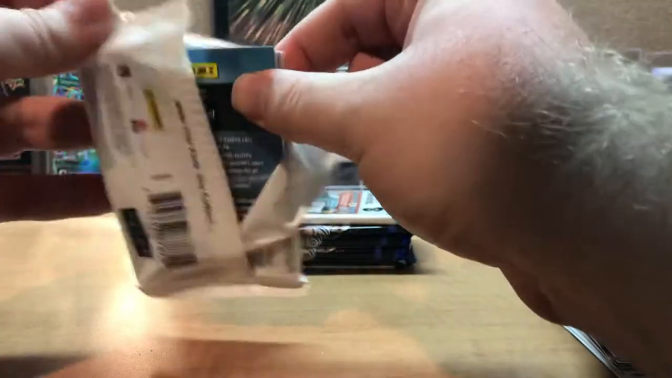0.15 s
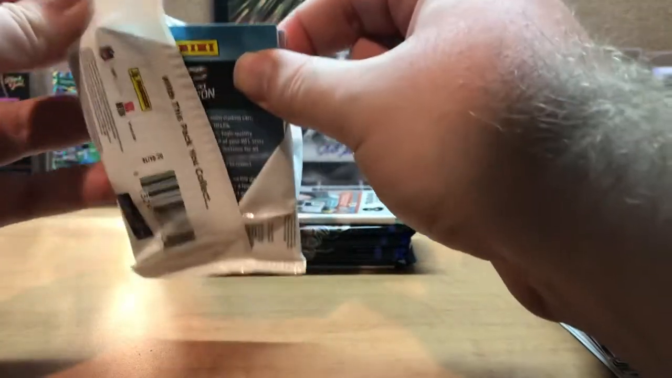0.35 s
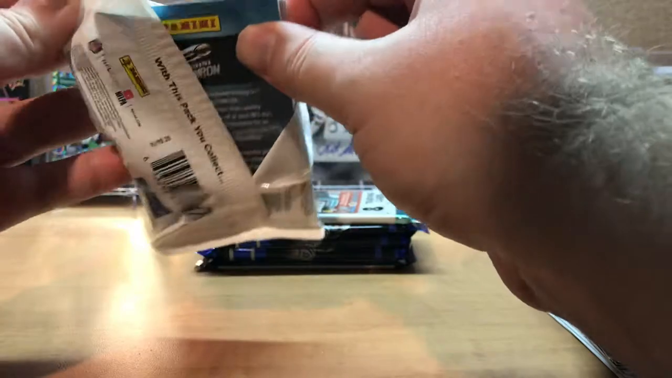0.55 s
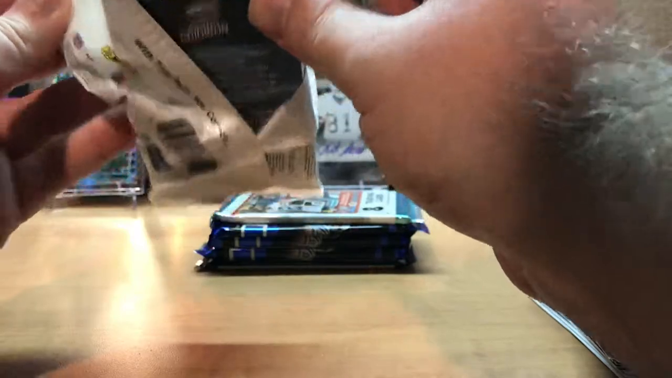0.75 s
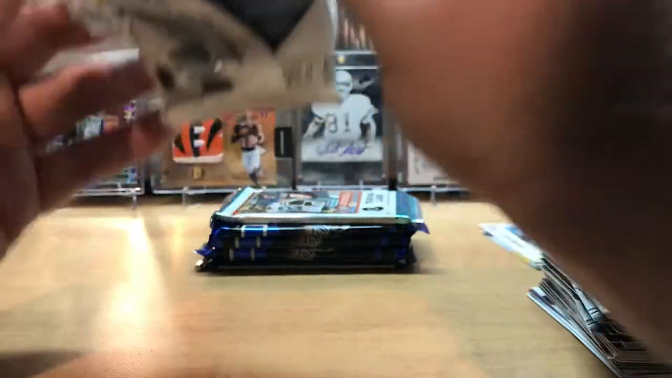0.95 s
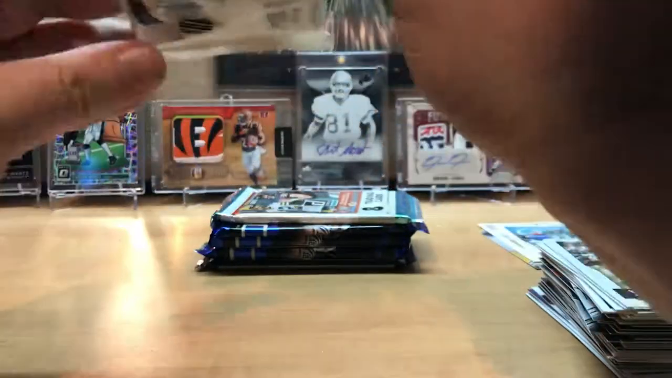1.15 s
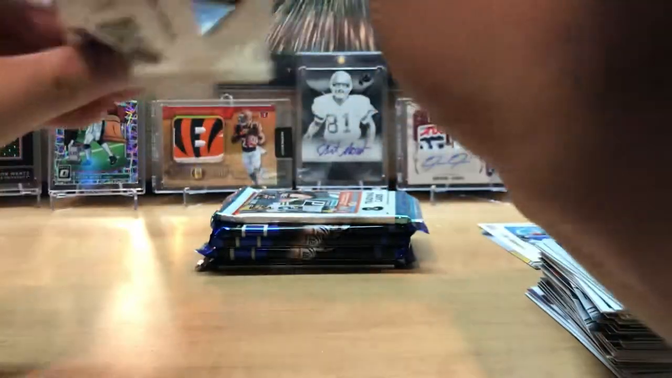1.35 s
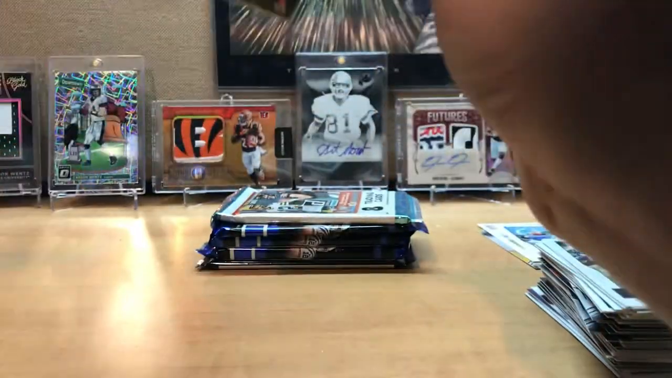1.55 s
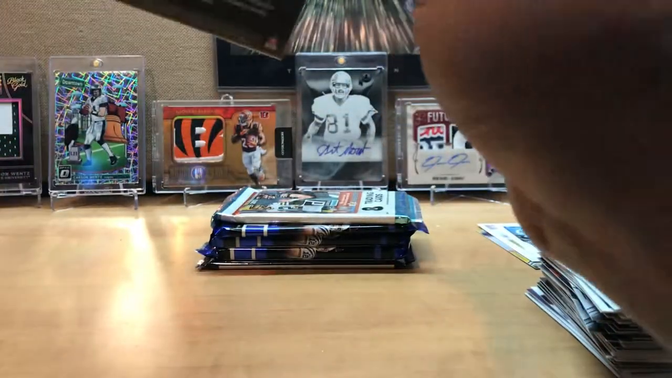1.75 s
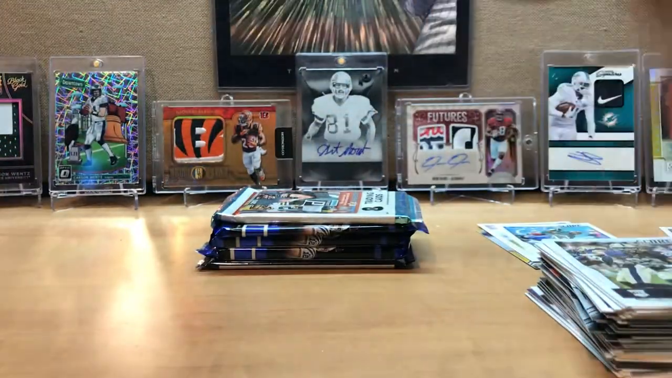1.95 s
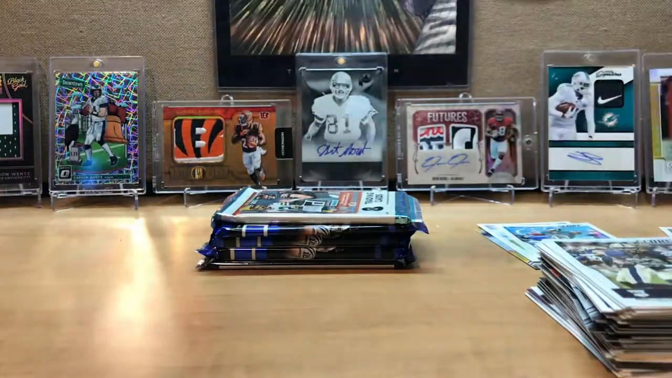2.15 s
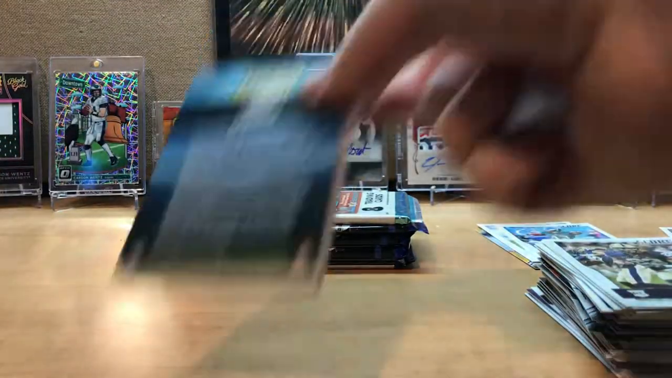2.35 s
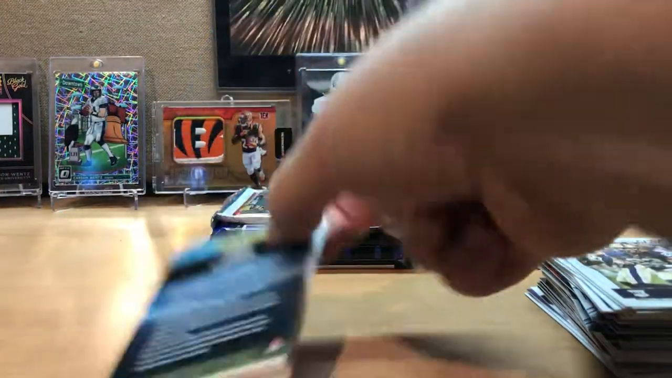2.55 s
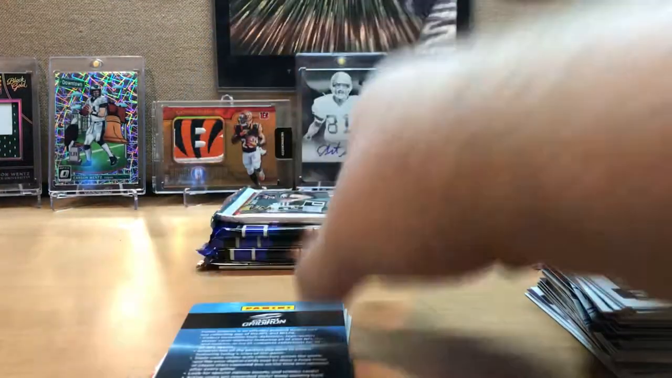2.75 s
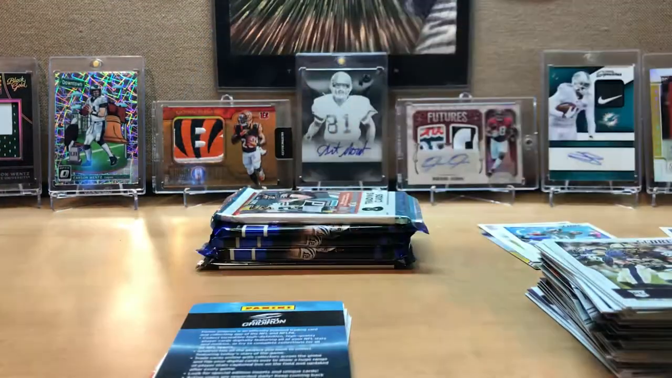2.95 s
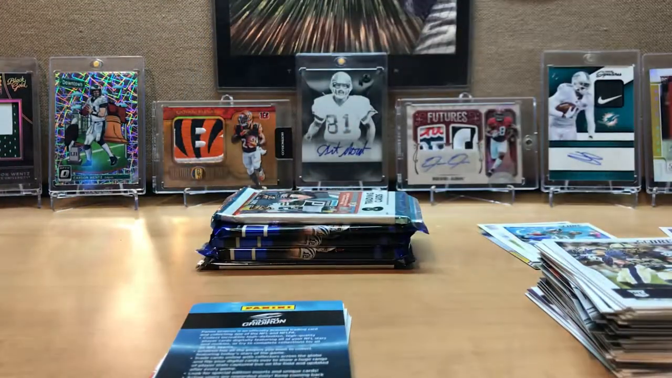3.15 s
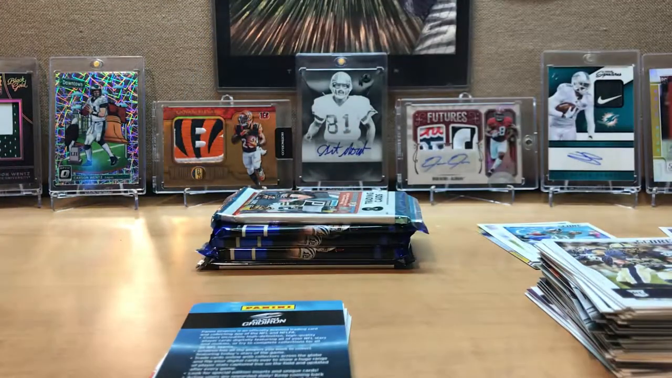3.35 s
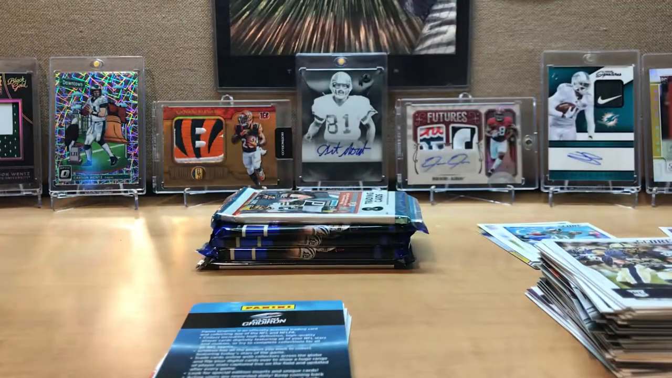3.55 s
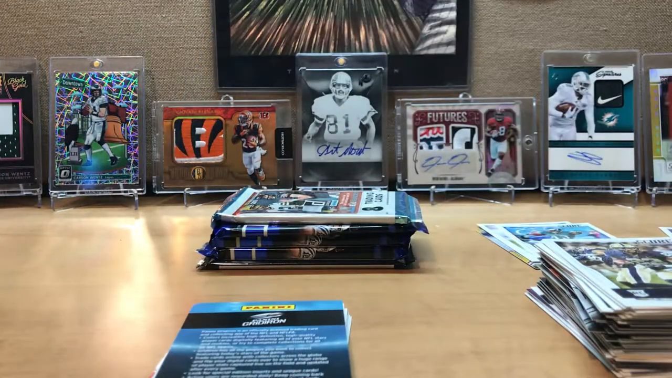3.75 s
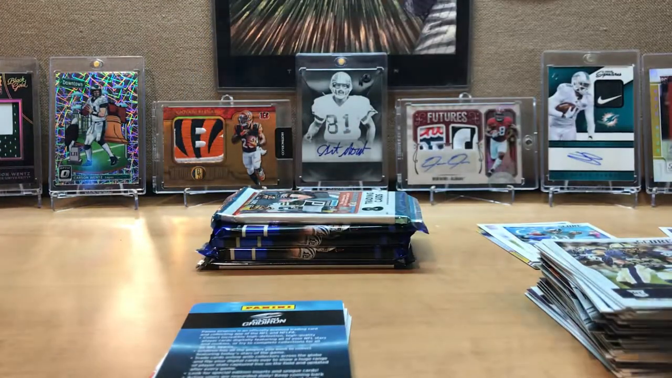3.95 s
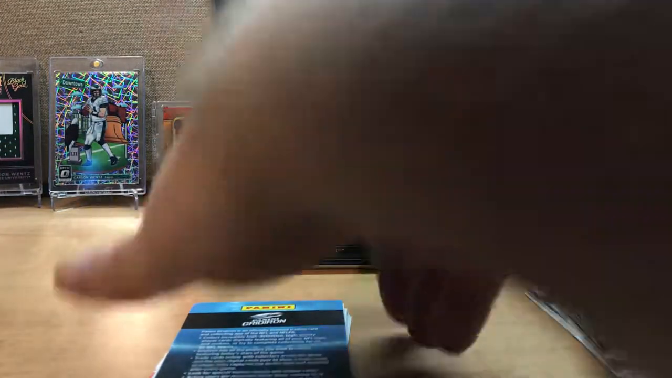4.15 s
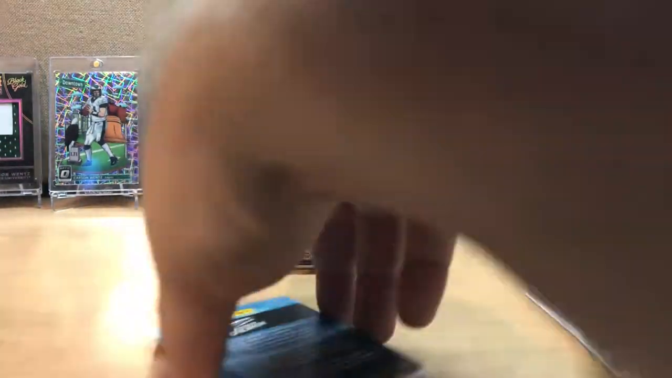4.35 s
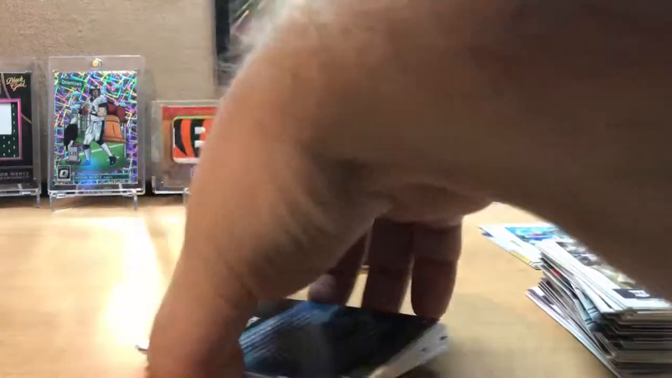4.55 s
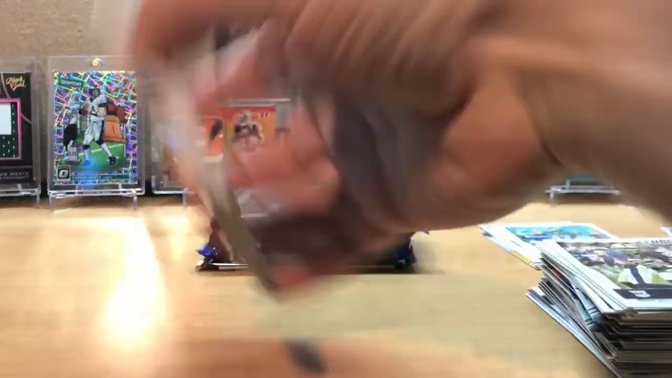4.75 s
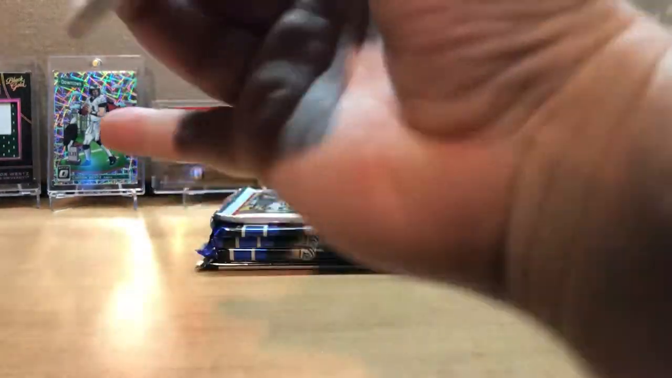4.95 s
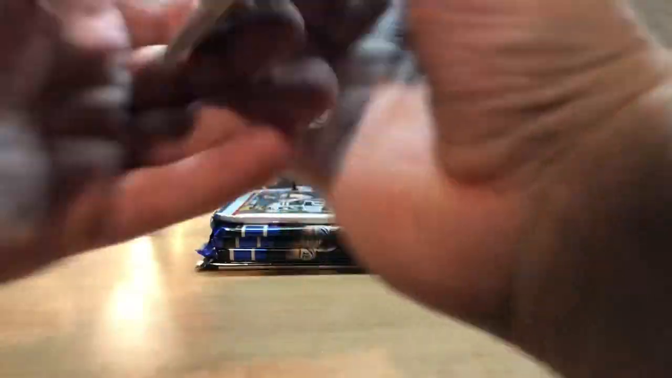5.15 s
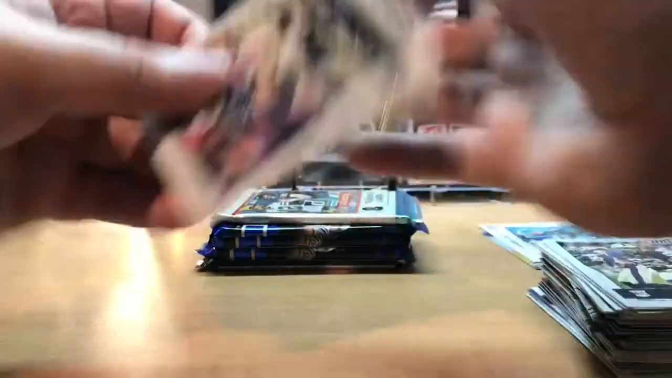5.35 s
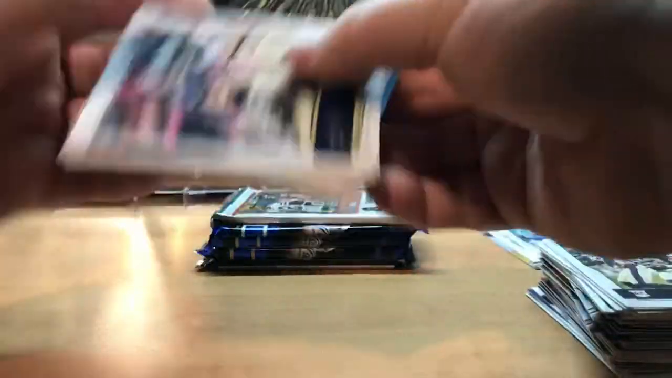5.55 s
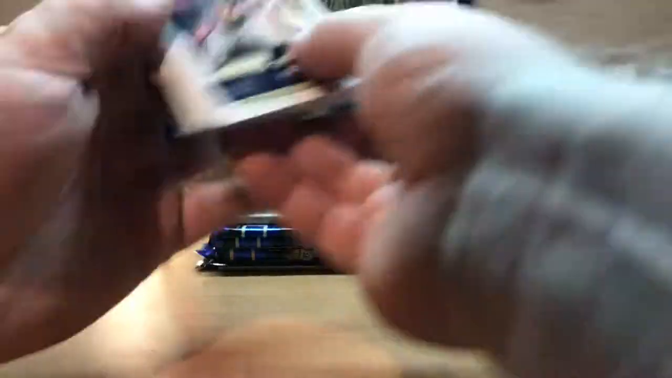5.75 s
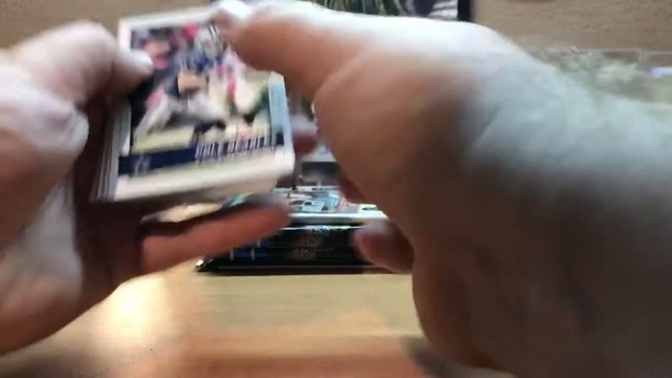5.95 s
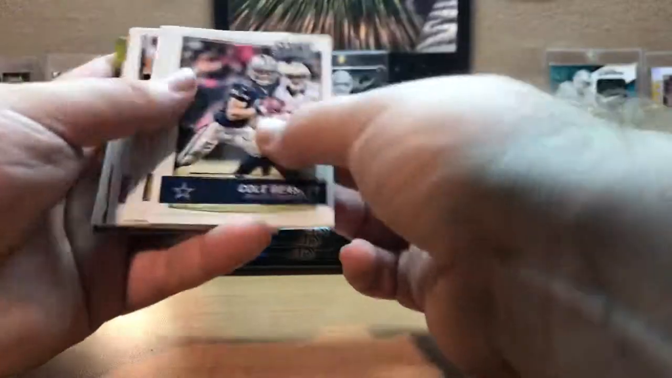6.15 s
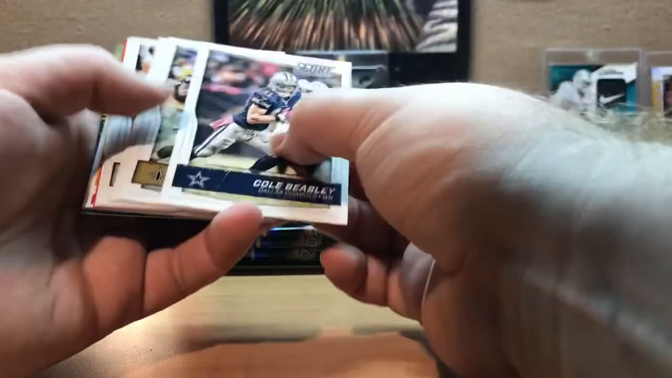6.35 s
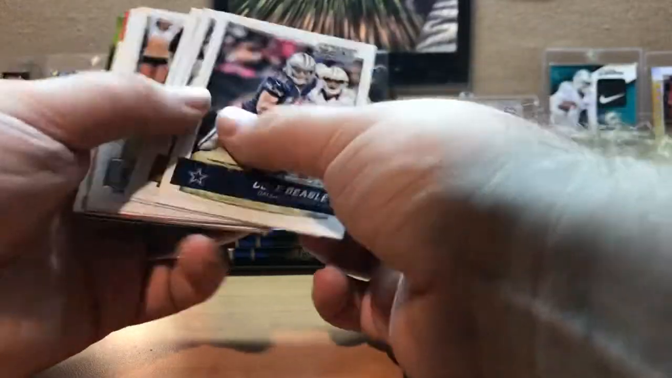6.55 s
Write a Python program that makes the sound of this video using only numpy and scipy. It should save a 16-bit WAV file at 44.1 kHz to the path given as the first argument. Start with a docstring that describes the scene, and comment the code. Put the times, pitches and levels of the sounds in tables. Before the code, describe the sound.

A close, dry recording in a small quiet room, with low rumble, soft hiss and a faint hum underneath. From about 0.1 seconds a foil pack is torn open: sharp, bright snaps crowd together, loudest around 0.15 to 0.3, with little hollow booms of air inside. Crackles continue unevenly, with another strong cluster from 0.7 to 0.85 and again from 1.05 to 1.3. A rush of hissing foil peaks near 1.45, then thins to sparse faint crinkles by 2. At 2.7 a card stack slaps onto the wooden desk with a short ringing knock. Around 3 the wrapper crackles lightly aside, fading to near quiet. At 4.27 a soft bump begins short dull scrapes as cards are dragged off until 4.7. From 5.2 onward, faint edge ticks, papery swishes and muffled hand bumps continue to about 6.6.

```python
"""At a wooden desk in a quiet room, close to the microphone, hands tear a foil card pack open: creases snap,
the air inside booms and the foil hisses in the fingers. The cards slide out and are dropped on the desk, whose
wood rings; the wrapper is crumpled aside with fainter snaps and a soft brush. The cards are then dragged off in
scraping strokes, lifted and fanned, ticking at their edges and swishing, while hands and arms shake and rub the
desk. Desk thumps, room rumble, hiss and hum lie underneath."""
import sys
import numpy as np
from scipy import signal
from scipy.fft import rfft, irfft
from scipy.io import wavfile
from scipy.ndimage import uniform_filter1d

SR = 44100
rng = np.random.default_rng(int(sys.argv[2]) if len(sys.argv) > 2 else 0)


def store_wav(level_fs):
    """Save 16-bit WAV to argv[1]."""
    pcm = np.round(np.clip(np.atleast_2d(level_fs), -1, 1) * 32767)
    wavfile.write(sys.argv[1], SR, pcm.T.astype(np.int16))


N = 291942  # samples in the scene


def amp(db):
    """Decibels to a linear gain."""
    return 10 ** (np.asarray(db) / 20)


def evened(x):
    """Scale to an rms of 1."""
    return x / np.sqrt(np.mean(x ** 2) + 1e-20)


def peaked(x):
    """Scale to a peak of 1."""
    return x / (abs(x).max() + 1e-12)


def smoothed(x, size):
    """Two moving averages in a row leave only slow wandering."""
    return uniform_filter1d(uniform_filter1d(x, size), size)


def add(mix, start_s, sound):
    """Lay a sound into the mix, cut off at the end of the scene."""
    part = mix[round(start_s * SR):][:len(sound)]
    part += sound[:len(part)]


def gain_curve(rows):
    """A gain along the whole scene from (start_s, level_db) rows, at -150 dB outside them."""
    start_s, level_db = np.transpose(rows)
    return amp(np.interp(np.arange(N) / SR, start_s, level_db, left=-150, right=-150))


def band(x, lo_hz, hi_hz):
    """Keep one band."""
    edges = [lo_hz, min(hi_hz, .45 * SR)]
    return signal.sosfilt(signal.butter(2, edges, "band", fs=SR, output="sos"), x)


def ring(x, hz, width_hz):
    """One resonance with two poles: the narrower it is, the longer it rings."""
    r = np.exp(-np.pi * width_hz / SR)
    return signal.lfilter([1, 0, -1], [1, -2 * r * np.cos(2 * np.pi * hz / SR), r * r], x)


def coloured(x, points):
    """Shape a spectrum through (pitch_hz, level_db) points, then scale to an rms of 1."""
    hz, db = np.transpose(points)
    bins = np.fft.rfftfreq(len(x), 1 / SR)
    gain = amp(np.interp(np.log(bins + 1), np.log(hz), db))
    return evened(irfft(rfft(x) * gain, len(x)))


def burst(t60_s, size=2400):
    """A sudden release that rattles out as decaying noise; its decay is held between 2 and 80 ms."""
    t = np.arange(size) / SR
    decay = amp(-60 * t / np.clip(t60_s, .002, .08))
    return rng.standard_normal(size) * decay * np.minimum(t / 0.000076, 1)


PATCH_WIDTH = .22  # resonance width of the small patch, as a share of its pitch


def click(level_db, hz, face_db, treble_db, t60_s, face_hz, face_width_hz):
    """A crack around the pitch of the small patch that let go, treble, and the larger face behind it."""
    x = burst(t60_s)
    wide = band(band(x, 0.33 * hz, 2.6 * hz), 1900, 13000)
    crack = peaked(peaked(wide) + 1.4 * peaked(ring(wide, hz, PATCH_WIDTH * hz)))
    treble = amp(treble_db) * peaked(band(band(x, 10000, 17000), 7300, 17000))
    face = amp(face_db) * peaked(band(ring(x, face_hz, face_width_hz), 420, 1500))
    return amp(level_db) * (crack + treble + face), x


# air inside the pack: pitch_hz, width_hz
POUCH = (362, 32)


def boom(x):
    """The air in the pack rings and puffs out."""
    pouch_hz, width_hz = POUCH
    ringing = peaked(ring(ring(x, pouch_hz, width_hz), pouch_hz, 180))
    puff = peaked(band(ring(x, 260, 130), 170, 360))
    return ringing + 0.53 * puff


# how hard the foil rubs in the fingers: start_s, level_db (of the hiss)
FOIL_RUB = [(0.0, -66.5), (0.14, -56), (0.33, -52), (0.51, -65), (0.69, -49.5), (0.83, -58), (1.04, -60.5),
            (1.09, -58.5), (1.31, -49), (1.42, -38), (1.475, -36), (1.49, -42), (1.55, -46.5),
            (1.63, -56.5), (1.71, -67.5), (2.4, -73.5), (2.751, -77.5), (3.509, -70), (3.93, -81)]
SMALL_PER_S = 9.9
SMALL_DB, SMALL_SPREAD_DB = 9.5, 8  # least level above the rubbing, and how far above that it may go
SMALL_PANEL_DB, SMALL_TREBLE_DB, SMALL_T60_S = -12, -8.5, 0.026


def small_snaps():
    """Unevenly spaced lesser snaps, their strength following the rubbing; rows as in FOIL_SNAPS."""
    rub_s, rub_db = np.transpose(FOIL_RUB)
    gap, size, pitch = rng.random((150, 3)).T
    start_s = np.cumsum(-np.log(1 - gap)) / SMALL_PER_S
    level_db = np.interp(start_s, rub_s, rub_db) + SMALL_DB + SMALL_SPREAD_DB * size
    pitch_hz = 2300 * 3.6 ** pitch
    return [(s, db, hz, SMALL_PANEL_DB, SMALL_TREBLE_DB, SMALL_T60_S)
            for s, db, hz in zip(start_s, level_db, pitch_hz) if s < rub_s[-1]]


# foil creases snapping: start_s, level_db, pitch_hz, panel_db and treble_db (against the crack), t60_s
FOIL_SNAPS = [(0.0889, -37.5, 4050, -7.5, -8, 0.057), (0.094, -24, 4070, -22, -9, 0.0016),
              (0.1139, -34.5, 4130, -17.5, -7, 0.088), (0.1443, -22, 4000, -7.5, 0, 0.018),
              (0.1606, -6, 4320, -31.5, -12, 0.011), (0.1847, -23, 5770, -4.5, 6, .006),
              (0.192, -15, 4230, -2.5, -3, 0.061), (0.1965, -0.5, 4100, -26.5, -21, .0034),
              (0.2038, -8.5, 6200, -10, -0.5, 0.02), (0.2086, -16.5, 5300, 1.5, -12, 0.018),
              (0.222, -16.5, 3770, -27, -17, .049), (0.226, -20, 6550, -6, 2, 0.0093),
              (0.2362, -3.5, 5900, -23.5, -30, 0.0029), (0.242, -8, 3703, -6, -6, 0.0016),
              (0.2504, -18, 6605, -14, -14, .009), (0.2556, -24, 3450, 8.5, -10, .0064),
              (0.2744, -19, 5766, -29.5, -16, .004), (0.295, -31, 2240, -1.5, 4.7, .009),
              (0.2987, -4.5, 3750, -12.5, -8.5, .0195), (0.3372, -18, 5780, -23, -19, .0053),
              (0.3403, -12.5, 5900, -24, -4.5, 0.0021), (0.3676, -28.5, 3600, 0.7, -29, 0.034),
              (0.4035, -36, 5810, -24, 5, .0046), (0.422, -39, 2710, -15.5, -35, 0.0077),
              (0.4348, -20.5, 5270, -12, 3.5, 0.019), (0.459, -23.5, 4540, -13, -2.5, 0.0091),
              (0.5179, -33.5, 3140, -4.5, -23, 0.018), (0.523, -36, 4090, -15, 10, 0.0032),
              (0.541, -43, 2320, 2, -16, 0.011), (0.565, -38.5, 6900, -26, 9.5, .006),
              (0.5844, -38, 8450, -25, 4, 0.013), (0.597, -31, 5210, -25.5, -7, .0044),
              (0.6052, -35.5, 2880, -2.5, -22, 0.029), (0.6153, -22.5, 3600, -7.5, 2, 0.014),
              (0.6635, -19.5, 3370, -7.5, -32, 0.0047), (0.674, -27, 2280, -8, -24, 0.015),
              (0.7202, -18, 4170, -15.5, 0, 0.028), (0.7313, -12, 5860, -19, -22, 0.0084),
              (0.7436, -18.5, 3320, -16, 2.5, 0.02), (0.7907, -38.5, 5210, -10.5, -12, .012),
              (0.8191, -11, 4200, -32, -2.5, 0.0017), (0.8407, -6, 3880, -28.5, -8, 0.0014),
              (0.8672, -32.5, 3150, -10.5, -14, 0.016), (0.997, -40, 2640, -2, -16, 0.11),
              (1.0007, -26, 5150, -21, -12.5, 0.0046), (1.0107, -27.5, 3040, -10, -10, 0.028),
              (1.0443, -36, 2450, -14.5, -17, 0.014), (1.0693, -26, 3040, -4.5, -10, 0.038),
              (1.082, -13.5, 3670, -10, -2.5, 0.018), (1.0927, -20, 4260, -7.5, -4, 0.061),
              (1.102, -10.5, 3700, -28, -21, 0.0033), (1.103, -11, 5900, -26.5, -21, 0.013),
              (1.1352, -11, 3500, -18, -11, 0.015), (1.1486, -24, 5940, -9, 1.5, 0.018),
              (1.1824, -24.5, 3220, -28.5, -32, 0.0053), (1.2282, -10.5, 7700, -13.5, -20, 0.021),
              (1.2468, -19.5, 2310, -20, -6, 0.026), (1.2638, -16.5, 7100, -15.5, -9, 0.015),
              (1.2868, -13.5, 7150, -19, 2, 0.0013), (1.3036, -27, 7040, -16, -17, 0.0093),
              (1.3222, -29, 6850, -28, -6, 0.027), (1.3922, -43, 5360, -25, 2.6, 0.0069),
              (1.4017, -15.5, 5740, -26, -20, 0.0089), (1.4049, -18, 2840, -38, -1.5, 0.011),
              (1.4701, -20, 2930, -16.5, -20, 0.015), (1.4755, -31, 2920, -7, -14, 0.012),
              (1.539, -28, 3130, -14, -6, 0.019), (1.546, -22.5, 3140, -14.5, -18, .018),
              (1.5777, -36, 3040, -4, -16, .011), (1.6006, -36.5, 3030, -10, -15, .02),
              (1.6183, -16.5, 5270, -22, -27, 0.008), (1.6799, -38, 2620, 0.5, -21.5, 0.017),
              (1.837, -33.5, 5870, -8.5, -13, 0.037), (1.97, -36.5, 5470, -11, -21, 0.097),
              (2.0709, -42, 2300, -7.5, -15, 0.099), (2.138, -51, 3540, -4.5, 4, 0.038),
              (2.2537, -49, 4500, -28, 2, .01), (2.937, -48.5, 4310, -24, 4, 0.006),
              (2.972, -45, 2640, -17, -5, 0.021), (2.989, -28, 8440, -35, 3, 0.012),
              (2.999, -33, 4470, -33, 2, 0.0056), (3.0128, -37, 4480, -30, 1, .009),
              (3.018, -25.5, 4200, -44, -12, .009), (3.0242, -18, 5450, -48, -27, .002),
              (3.033, -34, 5340, -31, 3, .007), (3.0404, -41, 7200, -13, 12, 0.0045),
              (3.0923, -49.5, 6030, -15, 4.5, .022), (3.1214, -42, 3200, -5, 1, 0.016),
              (3.276, -51, 4230, -2.5, -8, 0.023), (3.36, -47, 2350, -16.5, -14, .0075),
              (3.3724, -36, 8460, -16, -5, 0.0041), (3.3942, -43.5, 6850, -15, 0, 0.051),
              (3.402, -32, 3670, -21, -25, .013), (3.512, -43, 8230, -23.5, -5.5, .006),
              (3.5896, -51, 4100, -5.5, 10, .039), (3.8903, -42, 4360, -21, -9, .025)]
# squeezes that make the air in the pack boom: start_s, level_db
SQUEEZES = [(0.151, -35.5), (0.188, -31), (0.208, -26), (0.298, -32), (0.3655, -36), (1.082, -37),
            (1.135, -36.5), (1.3214, -40.5), (1.4761, -44.5), (2.0712, -48)]
# flat face of the pack: pitch_hz, width_hz
PANEL = (1200, 430)
POUCH_DB = -21.5  # boom of the air inside, against the panel


def foil():
    """Each crease snaps and sets off a little boom of the air in the pack; squeezes boom more."""
    out = np.zeros(N)
    for start_s, level_db in SQUEEZES:
        add(out, start_s, amp(level_db) * boom(burst(.008)))
    panel_hz, width_hz = PANEL
    for start_s, level_db, hz, panel_db, treble_db, t60_s in FOIL_SNAPS + small_snaps():
        bend = rng.uniform(.85, 1.12)  # the grip bends the face, so its pitch shifts
        snap, x = click(level_db, hz, panel_db, treble_db, t60_s, bend * panel_hz, width_hz)
        add(out, start_s, snap + amp(level_db + panel_db + POUCH_DB) * boom(x))
    return out


# colour of the foil's hiss: pitch_hz, level_db
FOIL_HISS = [(880, -49.5), (1500, -17.5), (1800, -5), (2930, 5), (5000, -0.5), (7200, 1), (9010, -6.5),
             (12700, -2.5), (15800, -9.5)]
RUSTLE_DB = -5  # lower rustle, against the hiss


def rubbing():
    """A fine hiss under dense crinkles; each crinkle rattles for a moment on one small fold of its own pitch."""
    fine, crinkles = rng.standard_normal(N), np.zeros(N)
    for hz in np.geomspace(900, 12000, 9):
        strength = amp(0.87 * np.minimum(rng.exponential(1, N), 3))
        starts = strength * (rng.random(N) < 90 / SR)  # about 90 a second
        rattle = signal.lfilter([1], [1, -np.exp(-1 / (0.0027 * SR))], starts)
        fold = ring(rattle * rng.standard_normal(N), hz, .35 * hz)
        crinkles += np.sqrt(hz) * evened(fold)
    slips = fine + .8 * evened(crinkles)
    rustle = evened(band(slips, 480, 1700))
    return gain_curve(FOIL_RUB) * (coloured(slips, FOIL_HISS) + amp(RUSTLE_DB) * rustle)


# card edges ticking: start_s, level_db, pitch_hz, treble_db (against the crack)
CARD_TICKS = [(4.306, -53, 5190, 1), (4.464, -53.5, 6000, -13), (4.7343, -53.5, 1953, -12),
              (5.2388, -40, 4860, 3), (5.5402, -43, 4530, 3), (5.5598, -43.5, 4480, -3),
              (5.58, -44.5, 7020, 2), (5.865, -51, 5300, -9.5), (5.882, -44, 5660, -7.5),
              (5.9106, -47, 2290, 5.5), (6.3798, -50.5, 2233, -14)]
TICK_BODY_DB, TICK_T60_S = -13.5, 0.0065


def card_edges():
    """Stiff edges flick past one another, each with a short crack."""
    out = np.zeros(N)
    for start_s, level_db, hz, treble_db in CARD_TICKS:
        tick, _ = click(level_db, hz, TICK_BODY_DB, treble_db, TICK_T60_S, 1200, 700)
        add(out, start_s, tick)
    return out


# soft brushing of skin, cards and crumpled wrapper:
# start_s, length_s, level_db, rustle_db (lower rustle, against the swish)
BRUSHES = [(2.601, .069, -70, -12), (3.015, 0.048, -44.5, -31), (3.657, 0.067, -59, -12),
           (4.304, 0.17, -55, -6.5), (4.527, 0.02, -63, -21), (4.849, 0.81, -70.5, -2.5),
           (5.141, 0.06, -69.5, -14.5), (5.231, 0.04, -60, -19), (5.279, .028, -55.5, -21),
           (5.304, .019, -54.5, -21), (5.582, .026, -53, -16), (5.601, 0.023, -56.5, -19),
           (5.725, 0.25, -61, -11), (5.993, .023, -60.5, -12), (6.172, 0.032, -61, -9),
           (6.203, 0.037, -63, -8), (6.24, 0.064, -63, -8), (6.303, 0.11, -61.5, -8.5),
           (6.485, .048, -55, -2), (6.56, 0.046, -61.5, -11)]
# colour of the brushing: pitch_hz, level_db
BRUSH_COLOUR = [(880, -63), (1500, -13), (2390, -5.5), (3310, -1), (5060, -2.5), (6470, -2), (10600, -6.5),
                (13700, -5), (15900, -5)]


def brushing():
    """Skin, cards and crumpled wrapper brush softly: fluttering noise in strokes that swell and fade."""
    out = np.zeros(N)
    flutter_db = 2.94 * evened(uniform_filter1d(rng.standard_normal(N), 300))
    noise = rng.standard_normal(N) * amp(flutter_db)
    swish, rustle = coloured(noise, BRUSH_COLOUR), evened(band(noise, 390, 2080))
    for start_s, length_s, level_db, rustle_db in BRUSHES:
        stroke = signal.windows.tukey(round(length_s * SR), .9)
        brush = (swish + amp(rustle_db) * rustle)[round(start_s * SR):][:len(stroke)]
        add(out, start_s, amp(level_db) * stroke * brush)
    return out


# ringing modes of the wooden desk top: pitch_hz, level_db, t60_s
DESK_MODES = [(392, -4, 0.069), (601.4, -1.5, 0.046), (650.4, -6.5, 0.043), (905, -3, 0.03),
              (1004, -6, 0.085), (1165, -6, 0.07), (1450, 0.5, 0.041), (1667, -10, .05), (2049, -3, 0.043),
              (3030, -27, 0.025), (3800, -19.5, 0.023)]
# cards and fingertips landing on the desk: start_s, level_db (of the wood), slap_db (against it), t60_s (slap)
TAPS = [(2.56, -41.5, -5, 0.023), (2.7108, -25.5, 9.5, 0.0018), (2.733, -14.5, 4.5, 0.01),
        (4.2662, -38.5, -8.5, 0.01), (5.106, -54.5, -27, 0.014), (5.721, -58, -31.5, .012)]


def tap(level_db, slap_db, t60_s):
    """A landing rings the modes of the desk top, with a slap of the card stack on it."""
    t = np.arange(8000) / SR
    modes = sum(amp(db - 60 * t / mode_t60_s) * np.sin(2 * np.pi * (hz * t + rng.random()))
                for hz, db, mode_t60_s in DESK_MODES)
    dense = peaked(band(burst(.07, size=8000), 350, 2300))  # the many weaker modes blur together
    wood = peaked(peaked(modes * np.minimum(t / 0.0013, 1)) + dense)
    x = burst(t60_s, size=8000)
    knock = peaked(ring(x, 2620, 1600))  # the card stack knocks
    slap = peaked(peaked(band(x, 1400, 12200)) + 0.95 * knock)
    return amp(level_db) * (wood + amp(slap_db) * slap)


def scraping():
    """Uneven stick-slip rings the desk top and grates directly, with a little brightness above."""
    unevenness_db = 2.0 * evened(uniform_filter1d(rng.standard_normal(N), 220))
    slips = rng.standard_normal(N) * amp(unevenness_db)
    wood = sum(amp(db) * ring(slips, hz, 2.3 / t60_s) for hz, db, t60_s in DESK_MODES)
    grating = evened(wood) + 0.41 * evened(band(slips, 224, 1400))
    scrape = band(band(grating, 252, 1460), 222, 1580)
    return evened(scrape) + amp(DRAG_BRIGHT_DB) * evened(band(slips, 1970, 4440))


# the card stack dragged over the desk in strokes: start_s, length_s, start_db, end_db
DRAGS = [(4.27, .16, -50, -67), (4.435, 0.17, -58.5, -52), (4.609, 0.088, -60, -59)]
DRAG_EDGE_S, DRAG_BRIGHT_DB = 0.012, -16.5  # fade at each end of a stroke; brightness against the scrape


def desk():
    """Taps and the stick-slip of dragged cards both ring the wooden top."""
    out = np.zeros(N)
    for start_s, level_db, slap_db, t60_s in TAPS:
        add(out, start_s, tap(level_db, slap_db, t60_s))
    scrape = scraping()
    for start_s, length_s, start_db, end_db in DRAGS:
        t = np.arange(0, length_s, 1 / SR)
        fades = np.clip(np.minimum(t, length_s - t) / DRAG_EDGE_S, 0, 1)
        stroke = amp(start_db + (end_db - start_db) * t / length_s) * fades
        add(out, start_s, stroke * scrape[round(start_s * SR):][:len(t)])
    return out


# hands and arms shaking and rubbing the desk: start_s, level_db
DESK_MOVEMENT = [(0.0, -75), (0.15, -60.5), (0.31, -59), (0.41, -62), (1.1, -70.5), (1.4, -49),
                 (1.64, -63.5), (1.75, -70), (3.4, -70), (4.15, -76.5), (4.4, -59.5), (4.73, -69),
                 (4.79, -56.5), (4.88, -56), (4.92, -67.5), (5.7, -65), (5.88, -68.5), (6.62, -66)]
# soft bumps of hand and wrist carried through the desk: start_s, level_db, knock_db (against the thump)
BUMPS = [(0.835, -59, -14), (1.092, -36, 1), (1.395, -42, -11), (1.464, -43, 6), (1.532, -41.5, -2.5),
         (2.066, -61, 15), (2.12, -50, -3), (2.564, -41.5, -14), (2.735, -33.5, -1), (4.267, -32.5, -6.5),
         (5.089, -47.5, -5.5), (5.718, -46, -7)]
THUMP_DB, THUMP_WANDER_DB = -60, 2.5  # the desk is never quite still
THUMP_SHARE = .3  # how much of the movement's swings in dB the thump follows


def shaking_and_rubbing_desk():
    """Hands and arms shake and rub the desk: dull low noise, and single bumps carried through the wood."""
    low, dull, drift = rng.standard_normal((3, N))
    movement = gain_curve(DESK_MOVEMENT)
    wander_db = THUMP_WANDER_DB * evened(smoothed(drift, 5000))
    thump = evened(movement ** THUMP_SHARE) * amp(THUMP_DB + wander_db)
    sway = ring(low, 61, 26)  # the desk rocks on its legs
    out = thump * evened(band(sway, 45, 160))
    out += movement * evened(band(band(dull, 180, 360), 200, 360))
    for start_s, level_db, knock_db in BUMPS:
        x = burst(0.074, size=8000)
        low_thump = peaked(band(ring(x, 60, 38), 40, 190))
        wrist_knock = peaked(band(ring(x, 230, 47), 270, 590))
        add(out, start_s, amp(level_db) * (low_thump + amp(knock_db) * wrist_knock))
    return out


# colour of the room rumble and microphone hiss: pitch_hz, level_db
FLOOR = [(20, -25.5), (38, -16.5), (58, -3.5), (90, -11.5), (200, -16), (349, -17), (510, -17.5),
         (1120, -21.5), (2500, -26), (6550, -31), (10700, -32.5), (11900, -30), (12600, -31),
         (15700, -36.5)]
FLOOR_DB = -66.5
# an appliance nearby: pitch_hz, level_db, waver_db
HUM = [(119.66, -72, 2.5), (619.5, -78, 0)]


def background():
    """Room rumble and microphone hiss as one shaped noise, and two wavering hum tones."""
    t, hum = np.arange(N) / SR, 0
    for hz, level_db, waver_db in HUM:
        waver = evened(smoothed(rng.standard_normal(N), 1500))
        tone = np.sqrt(2) * np.sin(2 * np.pi * hz * t + 0.5 * waver)
        hum = hum + amp(level_db + waver_db * waver) * tone
    return amp(FLOOR_DB) * coloured(rng.standard_normal(N), FLOOR) + hum


# how fast the room dies away: pitch_hz, t60_s
ROOM_DECAY = [(300, .25), (1500, 0.12), (5000, 0.065), (15000, 0.056)]
ROOM_DB = -15  # against the direct sound


def room(x):
    """Sparse reflections of random sign, each band dying at its own speed."""
    taps = np.zeros(SR // 2)
    at = np.arange(90, SR // 2 - 20, 20)
    taps[at + rng.integers(0, 20, len(at))] = rng.choice([-1., 1.], len(at))
    hz, t, bands = signal.stft(taps, SR, nperseg=128)
    room_hz, room_t60_s = np.transpose(ROOM_DECAY)
    t60_s = np.interp(np.log(hz + 1), np.log(room_hz), room_t60_s)
    tail = signal.istft(bands * amp(-60 * t / t60_s[:, None]), SR, nperseg=128)[1]
    return signal.fftconvolve(x, tail / np.linalg.norm(tail))[:N]


def scene():
    """Snaps, ticks, brushing and desk close by with their room; the other layers without it."""
    near = foil() + card_edges() + brushing() + desk()
    mix = near + amp(ROOM_DB) * room(near) + rubbing() + shaking_and_rubbing_desk() + background()
    return mix[None]


# narrow band thinned by the microphone housing: pitch_hz, width_hz, share removed
MIC_DIP = (10500, 680, 0.38)
EDGE_HZ = 15950  # upper band limit


def record(dry):
    """Peaks bend above 0.7; the microphone drops the deepest bass and thins one band; then the band limit."""
    over = .7 + .22 * np.tanh((abs(dry) - .7) / .22)
    bent = np.where(abs(dry) > .7, np.sign(dry) * over, dry)
    bent = signal.sosfilt(signal.butter(2, 42, "high", fs=SR, output="sos"), bent)
    hz, width_hz, share = MIC_DIP
    bent = bent - share * signal.lfilter(*signal.iirpeak(hz, hz / width_hz, fs=SR), bent)
    lowpass = signal.firwin(127, EDGE_HZ, window=("kaiser", 9), fs=SR)
    return signal.oaconvolve(bent, lowpass[None], "same")


dry = scene()
out = record(dry)
store_wav(out)
```